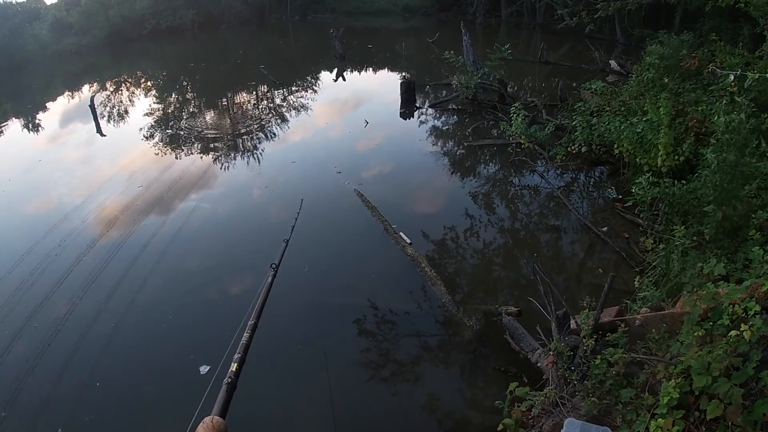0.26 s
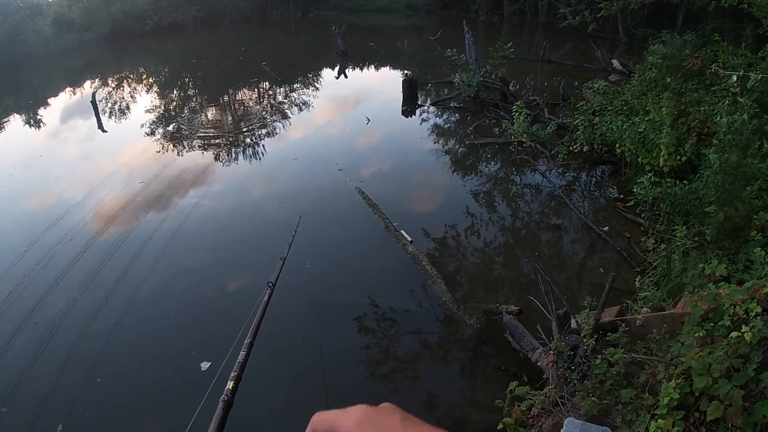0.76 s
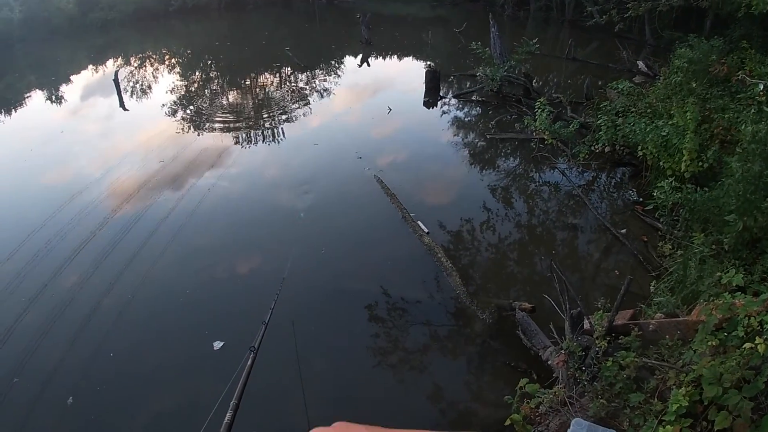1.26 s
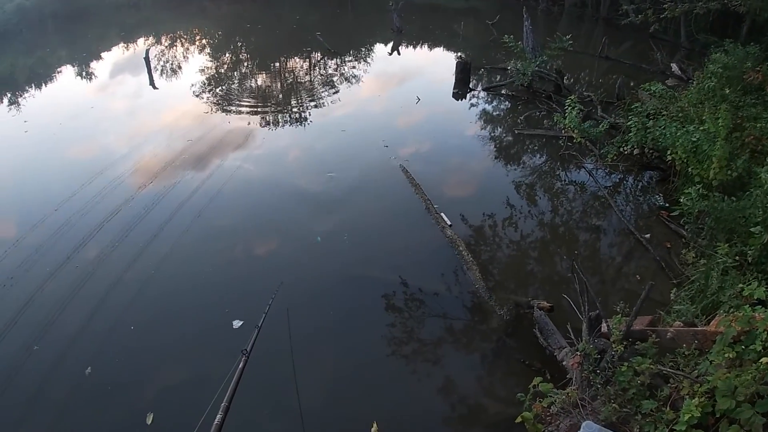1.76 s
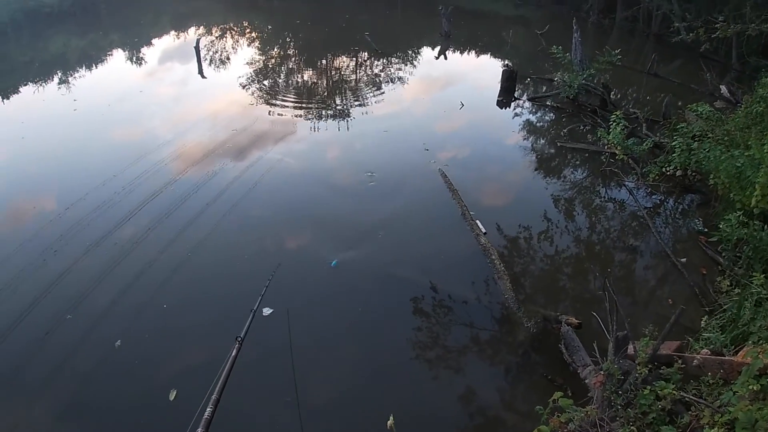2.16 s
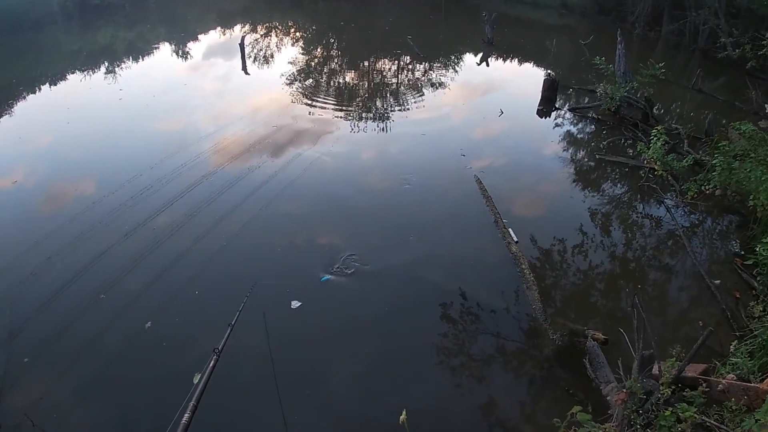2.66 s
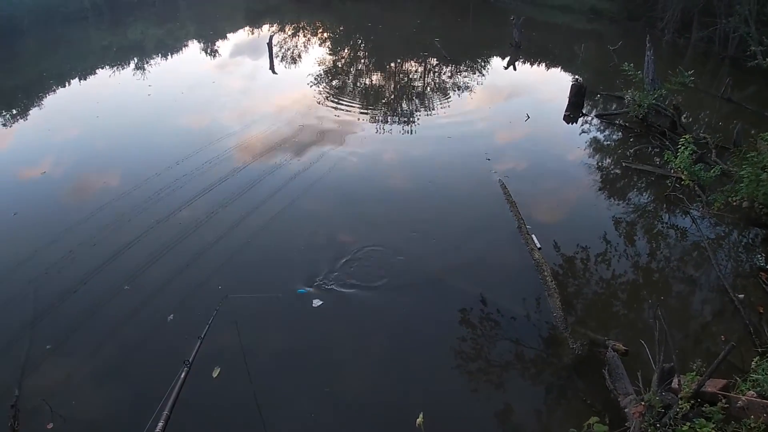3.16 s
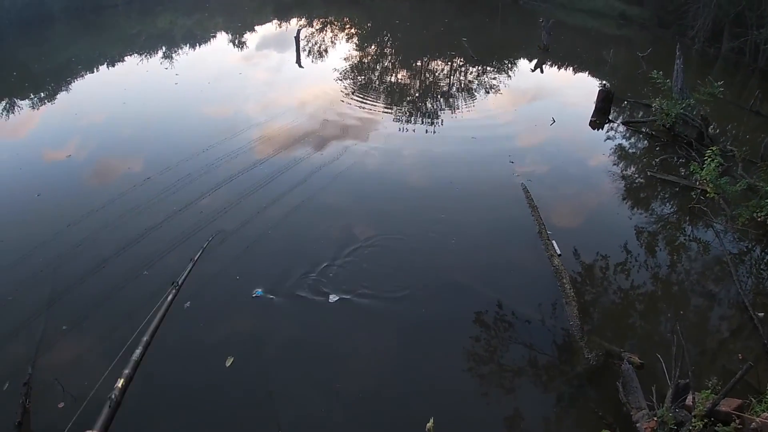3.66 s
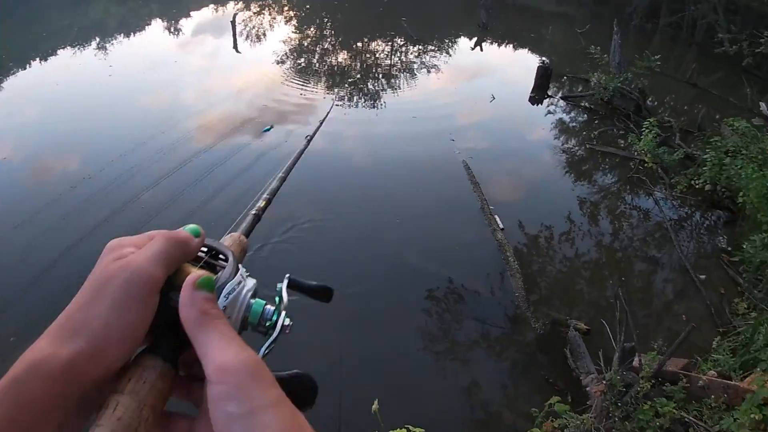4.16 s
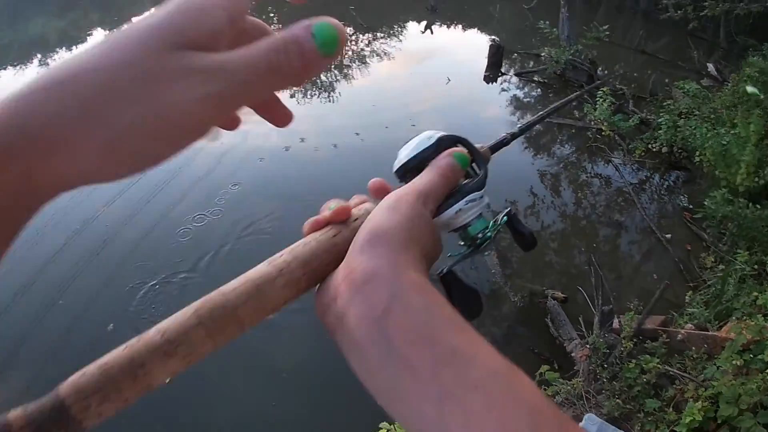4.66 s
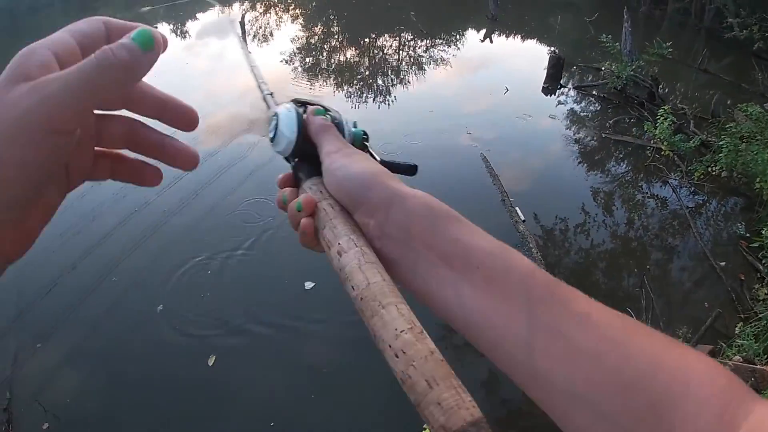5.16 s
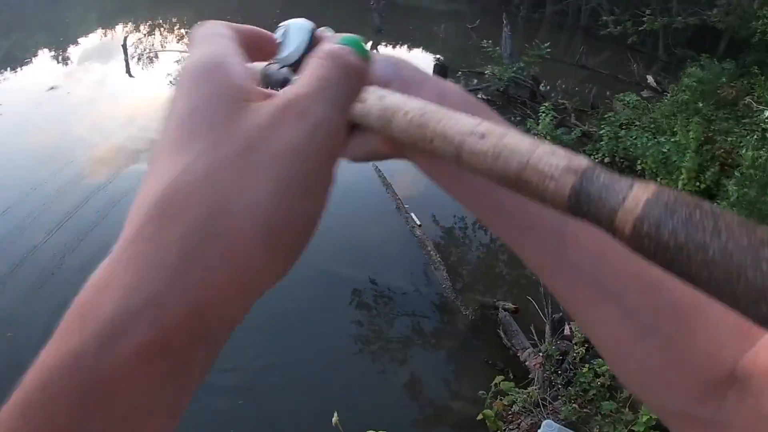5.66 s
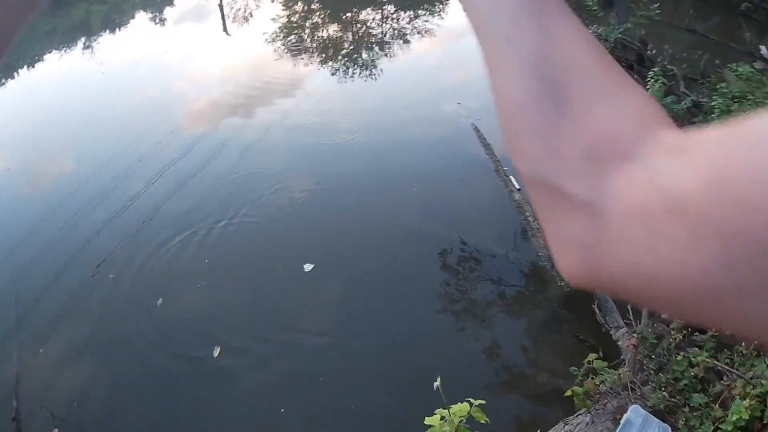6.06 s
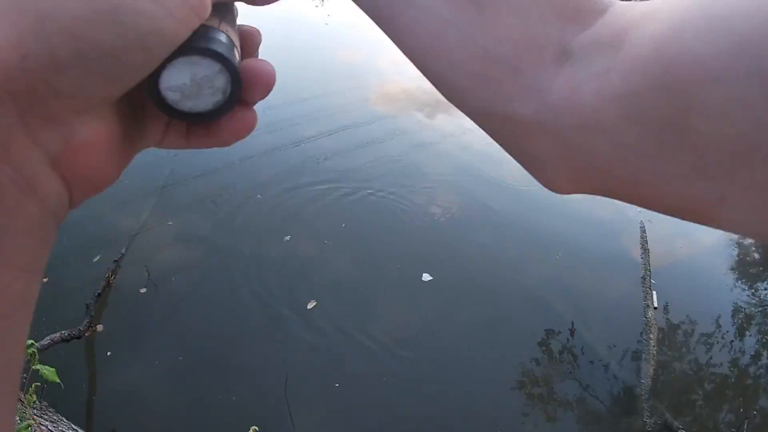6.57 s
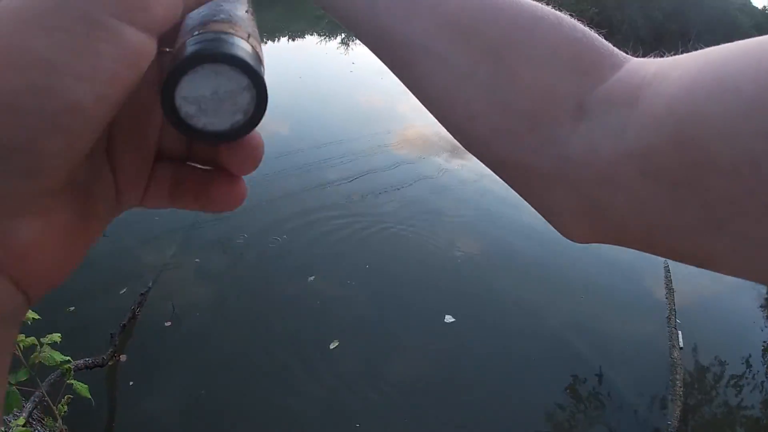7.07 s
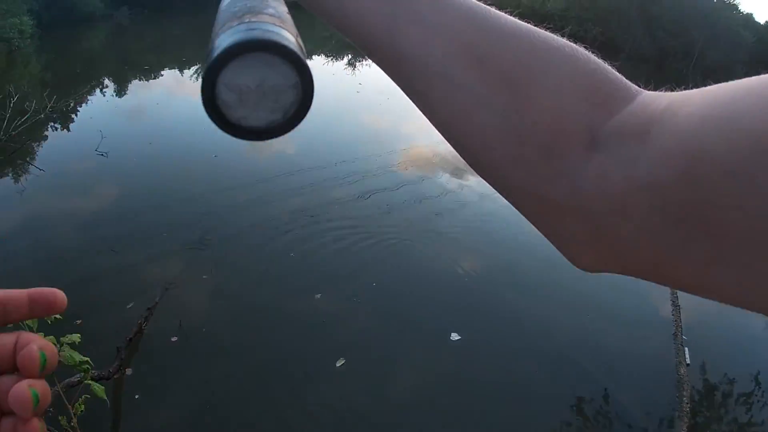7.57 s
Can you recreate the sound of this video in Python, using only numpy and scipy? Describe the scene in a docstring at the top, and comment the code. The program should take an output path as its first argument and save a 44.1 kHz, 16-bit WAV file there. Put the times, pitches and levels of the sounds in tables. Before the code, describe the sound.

A fishing reel is wound beside a pond, then cast.

```python
"""A pond bank at dusk: an angler winds in a lure, presses the reel's thumb bar and casts again.
The gears whirr and the line hisses in; the bar snaps, ringing the reel; the rod swishes as shaped noise.
The spool whines down as multiples of its slowing speed, while the line running out hisses as noise.
Behind it, bands of noise make an insect chorus and a distant rumble; tones make a low machine hum
and a few far bird chips. A camera on the chest hears it all in mono."""
import sys
import numpy as np
from scipy import signal
from scipy.fft import rfft, irfft
from scipy.io import wavfile

SR = 44100
rng = np.random.default_rng(int(sys.argv[2]) if len(sys.argv) > 2 else 0)


def inscribe(sig):
    """Save sig as 16-bit PCM at rate SR to the path in sys.argv[1].

    A 1-D sig is mono; a 2-D sig holds one channel per row.
    Samples are clipped to [-1, 1] before scaling.
    """
    pcm = np.round(np.clip(np.atleast_2d(sig).T, -1, 1) * 32767)
    wavfile.write(sys.argv[1], SR, pcm.astype(np.int16))


N = 344421
TIME = np.arange(N) / SR

# The spool is jerked up to speed, overruns top speed for a moment,
# then slows by air drag and bearing friction.
RELEASE_S, SPIN_UP_S, TOP_TURNS_PER_S = 6.235, .12, 346
OVERRUN_SHARE, OVERRUN_S, AIR_DRAG_S, BEARING_DRAG_S = .055, .04, 2.0, 2.35
# The lure's flight pulls line off the spool until it slackens. The hiss then falls at this rate,
# the rattle and the frame's song twice as fast, besides their fall with speed.
PULL_RISE_S, SLACK_AT_S, SLACK_DB_PER_S = 0.073, 6.723, 44
# Levels at top speed, and the power of the speed that each strength follows.
RATTLE_DB, RATTLE_POWER = -35.5, 1.43
HISS_DB, HISS_POWER = -37.5, 3.43
SING_DB, SING_POWER = -38.5, 1.9
# The line hisses harder at the first jerk, and faintly once slack.
JERK_S, JERK_LENGTH_S, JERK_DB, SLACK_HISS_DB = 6.3, 0.047, -40.5, -66.5
# The rattle and the song dip briefly.
LULL_S, LULL_LENGTH_S, LULL_DB = 6.395, 0.029, -5
# The bearings whirr from the moment the line slackens.
COAST_DB, COAST_FADE_DB_PER_S = -52, 3.5
# The reel's body, ringing most near 3.1 kHz. Each row: pitch in Hz, relative level in dB.
SPOOL_BODY = [(200, -5), (330, -4), (500, -6), (720, -2), (1000, -1.2), (1450, -2.5), (1750, 0), (2050, -2),
              (2450, 3), (2700, 3), (2950, 7), (3300, 7), (3550, 2), (4100, -6), (6000, -13), (10000, -28)]
# Soft whirr of the coasting bearings. Each row: pitch in Hz, relative level in dB.
COAST_COLOUR = [(1000, -3), (1500, -14), (1850, -1), (2500, -0.5), (3400, -5.5), (4200, -12.5), (7000, -25),
                (9000, -7), (10200, -21), (12000, -33)]
# Brief rasps of the running line, and one jolt of the reel's body near 3 kHz.
# Each row: middle in seconds, length in seconds, centre pitch in Hz, width in Hz, level in dB.
RASPS_AND_JOLT = [(6.3, .035, 12800, 2800, -55), (6.332, 0.081, 10200, 1100, -51),
                  (6.335, .08, 7550, 1000, -43), (6.35, 0.056, 3050, 650, -35),
                  (6.405, 0.05, 5750, 600, -41.5), (6.434, .012, 8800, 1100, -43),
                  (6.5, 0.1, 5350, 700, -47), (6.5, .014, 8250, 800, -48)]


def cast(turn_depth=0.28):
    """The free spool whines, sings and rattles in the reel's body, then coasts, while line hisses off it."""
    speed = spool_speed()
    # the line tugs unevenly, most at full speed, and the spool wavers slowly
    tug = .0035 * drift(150) * speed + .0025 * drift(9)
    turns = np.cumsum(TOP_TURNS_PER_S * speed * (1 + tug)) / SR
    each_turn = 1 + turn_depth * np.cos(2 * np.pi * turns)
    pull = ramp(RELEASE_S, PULL_RISE_S) * amp(-SLACK_DB_PER_S * since(SLACK_AT_S))
    lull = amp(LULL_DB * swell(LULL_S, LULL_LENGTH_S))

    rattle = amp(RATTLE_DB) * lull * pull ** 2 * speed ** RATTLE_POWER
    sing = amp(SING_DB) * lull * (pull * ramp(RELEASE_S, SPIN_UP_S)) ** 2 * speed ** SING_POWER
    whirr = amp(COAST_DB - COAST_FADE_DB_PER_S * since(SLACK_AT_S)) * ramp(SLACK_AT_S, PULL_RISE_S)
    hiss = amp(HISS_DB) * pull * speed ** HISS_POWER
    hiss += amp(JERK_DB) * swell(JERK_S, JERK_LENGTH_S)
    hiss += amp(SLACK_HISS_DB) * ramp(RELEASE_S, PULL_RISE_S)

    out = spool_whine(turns, speed)
    out += rattle * colour(noise() * each_turn, SPOOL_BODY)
    out += sing * frame_song(speed)
    out += whirr * colour(noise() * each_turn, COAST_COLOUR)
    out += hiss * line_hiss(turns)
    for s, length, hz, width, db in RASPS_AND_JOLT:
        out += amp(db) * swell(s, length) * fuzzy_tone(hz, width)
    return out


def spool_speed():
    """Share of top speed: a quick spin-up with a short overrun, then a long run-down."""
    top_s = RELEASE_S + SPIN_UP_S
    spin_up = np.sin(np.pi / 2 * ramp(RELEASE_S, SPIN_UP_S)) ** .5
    run_down = np.exp(-since(top_s) / BEARING_DRAG_S) / (1 + since(top_s) / AIR_DRAG_S)
    return spin_up * run_down * (1 + OVERRUN_SHARE * swell(top_s, 2 * OVERRUN_S))


# Overall level at top speed, and the power of the speed that the whine's strength follows.
WHINE_DB, WHINE_POWER = -43.5, 3.3
# The frame passes little of the whine above this pitch.
WHINE_TOP_HZ = 4500
# The whine changes colour as the spool settles and then coasts.
SETTLED_AT_S, COASTING_AT_S = 6.76, 6.96
# The axle shakes by a small share of a turn (given at top speed), less as it slows.
SHAKE_TURNS, SHAKES_PER_S = .013, 110
# The spool rocks in its bearings, so each multiple swells and flickers by itself.
ROCK_DB, ROCKS_PER_S, FLICKER_SHARE, FLICKERS_PER_S = 1.6, 25, .35, 70
# A thin whistle on one high multiple of the spool's speed.
WHISTLE_S, WHISTLE_LENGTH_S, WHISTLE_ORDER, WHISTLE_DB = 7.18, .19, 20, -59.5
# Multiples of the spool's speed, with levels relative to the whine's own.
# Each row: multiple, dB at top speed, dB as the line slackens, dB once the spool coasts.
SPOOL_ORDERS = [(1, -8, -11, -14), (2, -1, -7, -12), (3, -9, -3, -4), (4, -5, -1, -4), (5, -7, -10, -6),
                (6, -7, -8, -1), (7, 2, -3, -6), (8, -6, -5, -6), (9, -2, -8, -4), (10, -3, -6, -8),
                (11, -12, -3, -7), (12, -16, -3, -6), (13, -20, -6, -9), (14, -18, -7, -8),
                (15, -18, -14, -10), (16, -20, -12, -2), (17, -24, -14, -10), (18, -24, -18, -7),
                (20, -26, -20, -14)]


def spool_whine(turns, speed):
    """Multiples of the spool's speed swell as it rocks in its bearings; its shaking blurs the high ones most."""
    spinning = TIME > RELEASE_S
    stages_s = [RELEASE_S + SPIN_UP_S, SETTLED_AT_S, COASTING_AT_S]
    whine = np.zeros(N)
    for k, *stages_db in SPOOL_ORDERS:
        rock_db = ROCK_DB * (drift(ROCKS_PER_S)[spinning] - .5)
        strength = amp(np.interp(TIME[spinning], stages_s, stages_db) + rock_db)
        strength *= 1 + FLICKER_SHARE * drift(FLICKERS_PER_S)[spinning]
        strength /= 1 + (k * TOP_TURNS_PER_S * speed[spinning] / WHINE_TOP_HZ) ** 20
        shake = SHAKE_TURNS * (speed ** 2 * drift(SHAKES_PER_S))[spinning]
        cycles = k * (turns[spinning] + shake) + rng.random()
        whine[spinning] += strength * np.sqrt(2) * np.cos(2 * np.pi * cycles)
    whine *= amp(WHINE_DB) * ramp(RELEASE_S, SPIN_UP_S) ** 2 * speed ** WHINE_POWER
    whistle = np.cos(2 * np.pi * WHISTLE_ORDER * turns)
    return whine + amp(WHISTLE_DB) * swell(WHISTLE_S, WHISTLE_LENGTH_S) * whistle


# The frame sings in a band that sags a little from the release on; each strand in it is blurred.
SING_HZ, SING_SAG_HZ_PER_S, SING_WIDTH_HZ, STRAND_BLUR_HZ = 3230, 400, 290, 175


def frame_song(speed):
    """Rough strands at multiples of the spool's speed slide down through the frame's resonance in turn."""
    centre_hz = SING_HZ - SING_SAG_HZ_PER_S * since(RELEASE_S)
    song = np.zeros(N)
    for k in range(8, 16):
        hz = k * TOP_TURNS_PER_S * speed
        resonance = np.exp(-((hz - centre_hz) / SING_WIDTH_HZ) ** 2)
        song += resonance * fuzzy_tone(hz, STRAND_BLUR_HZ)
    return song


# The bands of the line's hiss swell only a little apart.
HISS_PATCH_DB, HISS_PATCHES_PER_S = 1.3, 40
# Line rubbing through the guides. Each row: pitch in Hz, relative level in dB.
LINE_COLOUR = [(500, -20), (1500, -7), (3000, 2.5), (4700, -3), (5600, 2), (6100, 2.5), (6800, -4),
               (7500, 4), (8300, -3.5), (9000, 1), (9700, -8.5), (10500, -8.5), (11600, -28), (13800, -26),
               (16000, -45)]


def line_hiss(turns, repeat=0.28, grain_db=2.0):
    """Line rubs through the guides, partly alike from turn to turn; its bands swell one apart from another."""
    rub = noise() * amp(grain_db * drift(450))
    turn_before = np.interp(turns - 1, turns, np.arange(N)).astype(int)
    rub = colour(rub + repeat * rub[turn_before], LINE_COLOUR)
    hz, spectrum = np.fft.rfftfreq(N, 1 / SR), rfft(rub)
    out = np.zeros(N)
    for k in range(10):  # bands 1600 Hz wide, up to 16 kHz
        band = irfft(spectrum * (hz // 1600 == k), N)
        out += band * amp(HISS_PATCH_DB * drift(HISS_PATCHES_PER_S))
    return out


# The thumb bar gives way, snaps home and rebounds.
# Each row: start in seconds, peak level in dB, brightest pitch in Hz, spread in octaves.
BAR_BLOWS = [(4.7826, -28, 2800, 0.63), (4.7833, -19.5, 3600, 1.06), (4.7840, -9.5, 2980, 0.74),
             (4.7849, -6, 9200, 0.27), (4.7871, -23, 8800, .8), (4.7892, -30, 2200, .5),
             (4.7921, -40, 8000, .6)]


def thumb_bar():
    """The bar's quick run of blows rings the reel, each starting a little softly."""
    return knocks(BAR_BLOWS, ring=0.74, rise_s=0.0007)


# Light ticks of line and tackle.
# Each row: start in seconds, peak level in dB, brightest pitch in Hz, spread in octaves.
TICKS = [(.037, -33, 6960, 0.2), (.202, -46, 9000, .3), (.302, -51, 9000, .4), (.418, -30.5, 7100, 0.21),
         (.467, -39, 7500, 0.35), (.802, -47, 10000, .3), (.973, -36, 4570, 0.6), (1.069, -52, 10500, .2),
         (1.217, -52, 10500, .2), (1.603, -36, 10000, 0.91), (1.633, -47, 10500, .3),
         (1.673, -51, 10500, .2), (2.058, -44, 8000, .3), (3.618, -43, 1600, 0.16), (3.788, -47, 7500, .4),
         (3.792, -45, 4200, .5), (3.799, -47, 8500, .5), (3.807, -41, 5500, 0.13), (4.000, -36, 3150, 0.2),
         (4.018, -46, 2900, .4), (4.074, -46, 9000, .15), (4.755, -33.5, 4300, 0.82),
         (4.759, -41, 3800, .4), (5.218, -49, 4000, .3), (5.322, -50, 2700, .2), (5.454, -43.5, 3700, 0.28),
         (5.570, -40, 5460, 1.3), (5.946, -44, 2670, 0.17), (6.070, -39, 3320, .4), (6.432, -29, 8800, .4)]


def tackle_ticks():
    """Light, sharp blows of line and tackle ring the reel and rod, dying away sooner than the bar."""
    return knocks(TICKS, ring=0.56, rise_s=0.0001)


# Ways in which the reel and rod ring; each knock's "ring" factor scales the fade times.
# Each row: pitch in Hz, relative level in dB, seconds to fade by 60 dB before that factor.
REEL_MODES = [(527, 6, 0.02), (777, -1, 0.014), (1550, -19, 0.014), (2020, -15.5, 0.027),
              (2550, -18, 0.017), (3160, -9.5, 0.013), (3370, -2, 0.0051), (3764, -10, 0.014),
              (4460, -6.5, 0.005), (5140, -12, 0.0094), (5900, -12.5, 0.0069), (7100, -2, 0.0028),
              (8000, -0.5, 0.0037), (8650, -14.5, 0.0096), (9290, -6, 0.0057), (12000, -27, 0.0038),
              (14300, -20, 0.009)]


def knocks(rows, ring, rise_s):
    """Every blow rings the reel's modes, most strongly those near its brightest frequency."""
    out, t = np.zeros(N), np.arange(2000) / SR
    hz, db, t60 = np.transpose(REEL_MODES)[:, :, None]
    sign = (-1) ** np.arange(len(hz))[:, None]  # neighbouring modes swing opposite ways
    fade = amp(db - 60 * t / (t60 * ring))
    modes = sign * fade * np.sin(2 * np.pi * hz * t) * (1 - np.exp(-t / rise_s))
    for s, peak_db, bright_hz, spread_octaves in rows:
        octaves_away = np.log2(hz / bright_hz)
        blow = (modes / (1 + (octaves_away / spread_octaves) ** 2)).sum(0)
        add(out, s, amp(peak_db) * blow / abs(blow).max())
    return out


# Air pushed on to the microphone. Each row: middle in seconds, length in seconds, level in dB.
PUFFS = [(6.2, 0.13, -37), (6.315, 0.042, -31), (6.48, .25, -55)]
# The rod's fast stroke and follow-through. Each row: middle in seconds, length in seconds, level in dB.
SWISHES = [(6.259, 0.027, -33.5), (6.3, 0.07, -42.5)]
# The rod's swish, hooting in two bands. Each row: pitch in Hz, relative level in dB.
SWISH_COLOUR = [(250, -10), (620, -8), (950, 3), (1150, -1), (1400, -12), (1650, -3), (1900, 0),
                (2450, -15), (5000, -17), (10000, -20), (15000, -44)]


def swing():
    """The rod cuts the air, and the arms push a puff of it on to the microphone."""
    puff = colour(noise(), [(8, -8), (25, 0), (60, -16), (130, -18.5), (400, -33), (2000, -80)])
    return swells(PUFFS) * puff + swells(SWISHES) * colour(noise(), SWISH_COLOUR)


# Line hisses on to the spool while the winding is brisk, then drops and dies away as it slows.
WINDING_DB, SLOWS_AT_S, SLOWING_S, SLOW_DROP_DB, WINDING_FADE_DB_PER_S = -65, 1.01, .12, 6.5, 5.5
# Strokes of the reel handle; the push in each spans 1.72 times the length given.
# Each row: middle in seconds, length in seconds, level in dB, gear teeth per second.
CRANKS = [(.18, 0.1, -56.5, 114), (0.315, 0.21, -53.5, 156), (0.963, 0.2, -53.5, 130),
          (1.57, .26, -60.5, 130)]
# Colour of the gears. Each row: pitch in Hz, relative level in dB.
GEARBOX_COLOUR = [(500, -44), (950, -5.5), (1280, 2), (1600, -8.5), (2100, -21.5), (3000, -28), (5000, -48)]
# Line winding on to the spool. Each row: pitch in Hz, relative level in dB.
WINDING_COLOUR = [(1500, -21), (2600, -6), (2980, 3.5), (3230, -4), (3500, 3.5), (4500, -12), (7200, 1.5),
                  (9400, -13.5), (11200, -20), (15000, -34)]
# Brief high fizzes during the winding. Each row: middle in seconds, length in seconds, level in dB.
FIZZES = [(1.03, 0.046, -56), (1.15, .07, -52.5)]


def retrieve(tooth_sharpness=3.8):
    """Each push on the handle makes the gear teeth rasp while wet line hisses on to the spool."""
    rasp = np.zeros(N)
    for s, length, db, teeth_per_s in CRANKS:
        push = np.cos(np.pi / 2 * np.clip((TIME - s) / length * 1.16, -1, 1)) ** 2
        teeth = unit(abs(np.cos(np.pi * teeth_per_s * TIME)) ** tooth_sharpness)
        rasp += amp(db) * push * teeth
    winding_db = WINDING_DB - SLOW_DROP_DB * ramp(SLOWS_AT_S, SLOWING_S)
    winding_db -= WINDING_FADE_DB_PER_S * since(SLOWS_AT_S)
    line = amp(winding_db) * colour(noise() * amp(2.0 * drift(400)), WINDING_COLOUR)
    fizz_colour = [(4000, -37), (5600, -4), (7000, 8), (7800, -4), (8800, -30)]
    fizz = swells(FIZZES) * colour(noise(), fizz_colour)
    return rasp * colour(noise(), GEARBOX_COLOUR) + line + fizz


# The steady rub of the hold between slides.
GRIP_FROM_S, GRIP_TO_S, GRIP_DB = 3.6, 6.2, -67
# Hands sliding over the grip, sleeves moving.
# Each row: middle in seconds, length in seconds, level in dB.
SLIDES = [(3.82, 0.12, -60.5), (4.1, 0.27, -58), (4.36, .11, -60.5), (4.71, 0.23, -58), (5.1, .1, -63),
          (5.49, 0.1, -64), (5.83, 0.12, -61.5), (6.0, 0.18, -54.5), (6.19, 0.14, -51), (6.245, 0.041, -44)]
# Skin and cloth on the grip. Each row: pitch in Hz, relative level in dB.
HANDLING_COLOUR = [(900, 6.5), (2200, 0), (3400, 3), (5000, 2), (8000, 0.5), (10000, -7.5), (11500, -19),
                   (14000, -19), (16000, -34)]
# Fingers rubbing on the grip and reel.
# Each row: start in seconds, length in seconds, centre pitch in Hz, width in Hz, level in dB.
RUBS = [(3.779, .02, 5000, 1300, -56), (3.786, .013, 3500, 900, -58), (3.804, .007, 5350, 1000, -50),
        (3.833, .017, 2350, 650, -60), (3.924, .008, 4630, 1097, -53.5), (5.038, 0.085, 3900, 900, -66),
        (5.105, .02, 2300, 600, -61), (5.465, .012, 5400, 700, -65), (5.48, .06, 2290, 400, -68),
        (5.929, 0.0082, 2680, 896, -54), (5.96, 0.11, 2960, 700, -58.5), (6.047, .02, 3620, 499, -55),
        (6.067, 0.011, 1690, 502, -54), (6.163, 0.042, 3100, 803, -52)]


def handling(grain_db=2.0, catch_db=3.5):
    """Skin and cloth slip over the cork grip in small grains; a finger that catches gives a broken rasp."""
    hold = level([(GRIP_FROM_S, GRIP_DB), (GRIP_TO_S, GRIP_DB)])
    sliding = np.hypot(swells(SLIDES), hold)
    out = sliding * colour(noise() * amp(grain_db * drift(500)), HANDLING_COLOUR)
    catches = unit(amp(catch_db * drift(220)))
    for s, length, hz, width, db in RUBS:
        stroke = np.sin(np.pi * np.clip((TIME - s) / length, 0, 1))
        out += amp(db) * stroke * catches * fuzzy_tone(hz, width)
    return out


# Insect chorus in two shrill bands. Each row: pitch in Hz, relative level in dB.
CHORUS_COLOUR = [(4800, -32), (5700, -20.5), (5950, -13), (6180, -4), (6450, 0.5), (6700, -6.5),
                 (6950, -15), (7200, -18.5), (7450, -10.5), (7680, -4.5), (7900, -13.5), (8100, -11.5),
                 (8400, -38), (9600, -48)]
# The chorus swelling and sinking. Each row: time in seconds, level in dB.
CHORUS_LEVEL = [(0, -53.5), (3.8, -51.5), (5.8, -53.5), (6.9, -56), (7.81, -55)]
# Single high trillers.
# Each row: start in seconds, end in seconds, pitch in Hz, width in Hz, level in dB.
TRILLERS = [(0, 4.65, 9370, 200, -78), (0, 2.9, 9020, 108.6, -84)]


def insects(flutter_db=0.26, wingbeats_per_s=90):
    """Countless wing strokes merge in two shrill bands; two singers trill above them, then stop."""
    strokes = noise() * amp(flutter_db * drift(wingbeats_per_s))
    out = level(CHORUS_LEVEL) * colour(strokes, CHORUS_COLOUR)
    for start, end, hz, width, db in TRILLERS:
        out += level([(start, db), (end, db)]) * fuzzy_tone(hz, width)
    return out


# Far bird chips.
# Each row: start in seconds, length in seconds, start pitch in Hz, end pitch in Hz, level in dB.
CHIPS = [(1.92, .13, 3500, 3650, -76), (2.15, .18, 2850, 2750, -74), (2.61, .13, 3650, 3000, -72),
         (2.88, .14, 2950, 2700, -74), (3.0, .2, 2700, 2800, -76.5), (3.38, .1, 3700, 3050, -72.5),
         (4.895, .03, 2950, 2750, -65.5), (5.23, .026, 3500, 3750, -64.5), (5.245, .06, 3760, 3740, -70)]


def birds(blur_hz=400, echo_s=.03, flutter_db=3):
    """Short glides, blurred and broken by their way through the trees."""
    out = np.zeros(N)
    for s, length, from_hz, to_hz, db in CHIPS:
        part = np.clip((TIME - s) / length, 0, 1)
        echo = 0.11 * part * np.exp(-since(s + length) / echo_s)
        glide_hz = from_hz + (to_hz - from_hz) * part
        out += amp(db) * (np.sin(np.pi * part) + echo) * fuzzy_tone(glide_hz, blur_hz)
    return out * amp(flutter_db * drift(45))


RUMBLE_DB = -42
HUM_HZ, HUM_WAVER_DB, HUM_WAVERS_PER_S = 77.1, 1.78, 9
# Distant rumble. Each row: pitch in Hz, relative level in dB.
RUMBLE_COLOUR = [(20, -16), (38, -7), (56, -1.5), (68, 2.5), (90, -2), (120, -2), (200, -6), (330, -14),
                 (480, -15.5), (760, -18), (1050, -27), (1800, -33), (4000, -52), (9000, -42), (11500, -65),
                 (15000, -67)]
# Machine hum, sinking and returning on the air. Each row: time in seconds, level in dB.
HUM_LEVEL = [(0, -33), (1.4, -36.5), (2.3, -40), (3.3, -44), (4.15, -43.5), (4.6, -39.5), (5.6, -37),
             (6.8, -35), (7.81, -37.5)]
# Weaker tones of the machine. Each row: pitch in Hz, width in Hz, level in dB.
HUM_TONES = [(56.6, 4, -53.5), (173.7, 3.01, -56), (700, 14, -70)]


def distance():
    """Far rumble, made of low noise, with a machine droning in it on a few wavering tones."""
    out = amp(RUMBLE_DB) * colour(noise(), RUMBLE_COLOUR)
    waver = amp(HUM_WAVER_DB * drift(HUM_WAVERS_PER_S))
    out += level(HUM_LEVEL) * unit(waver * np.sin(2 * np.pi * HUM_HZ * TIME))
    for hz, width, db in HUM_TONES:
        out += amp(db) * fuzzy_tone(hz, width)
    return out


def amp(db):
    """Decibels to gain."""
    return 10 ** (np.asarray(db) / 20)


def unit(x):
    """Scales to an rms (average strength) of one."""
    return x / np.sqrt(np.mean(x ** 2) + 1e-20)


def level(rows):
    """Gain from a dB curve that fades to silence outside its span."""
    outside = since(rows[-1][0]) + np.maximum(rows[0][0] - TIME, 0)
    return amp(np.interp(TIME, *np.transpose(rows))) * np.exp(-(outside / 0.027) ** 2)


def swell(s, length):
    """A smooth rise and fall of height one about a time; the length is taken at half height."""
    return .5 ** ((2 * (TIME - s) / length) ** 2)


def swells(rows):
    """Gain of a series of movements, each rising and falling smoothly."""
    return sum(amp(db) * swell(s, length) for s, length, db in rows)


def since(s):
    """Seconds gone by after a time, zero before it."""
    return np.maximum(TIME - s, 0)


def ramp(s, length):
    """Rises from zero to one, starting at a time."""
    return np.minimum(since(s) / length, 1)


def noise():
    """White noise."""
    return rng.standard_normal(N)


def drift(per_s):
    """Smooth random wandering of rms one, in straight lines between random points."""
    knots = rng.standard_normal(N // 16)
    return unit(np.interp(TIME * per_s, np.arange(len(knots)), knots))


def fuzzy_tone(hz, width_hz):
    """A tone whose strength and phase wander, so that it fills a narrow band; rms one."""
    phase = 2 * np.pi * np.cumsum(hz * np.ones(N)) / SR
    return unit(drift(width_hz) * np.cos(phase) + drift(width_hz) * np.sin(phase))


def colour(x, points):
    """Filters by a spectrum drawn on a log-frequency axis; rms one."""
    hz, db = np.transpose(points)
    gain = amp(np.interp(np.log(np.fft.rfftfreq(N, 1 / SR) + 1), np.log(hz), db))
    return unit(irfft(rfft(x) * gain, N))


def add(mix, s, sound):
    """Adds a sound into the mix at a time."""
    part = mix[max(round(s * SR), 0):][:len(sound)]
    part += sound[:len(part)]


def scene():
    """Angler and pond, the same in both channels."""
    angler = cast() + thumb_bar() + tackle_ticks() + swing() + retrieve() + handling()
    pond = insects() + birds() + distance()
    mono = angler + pond
    return np.array([mono, mono])


def record(dry, edge_hz=15700):
    """The camera's band limit: little passes above its edge."""
    low_pass = signal.firwin(511, edge_hz, window=("kaiser", 9), fs=SR)
    return signal.oaconvolve(dry, low_pass[None], "same")


dry = scene()
out = record(dry)
inscribe(out)
```